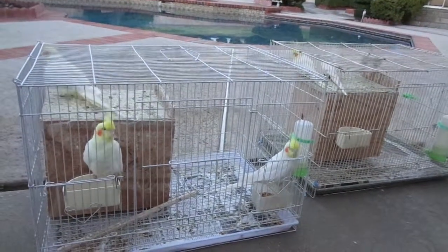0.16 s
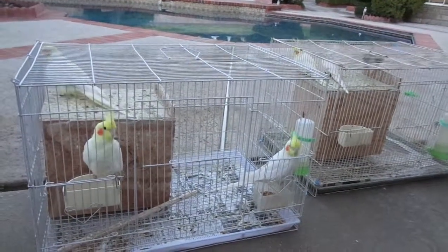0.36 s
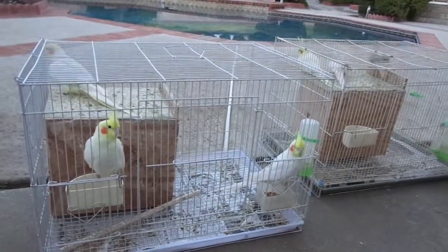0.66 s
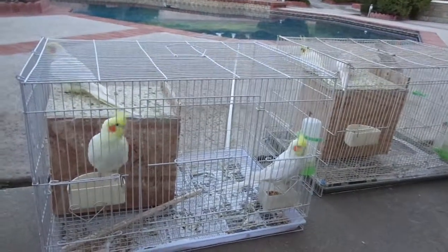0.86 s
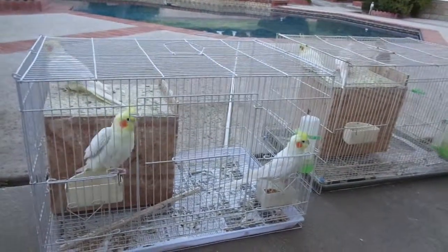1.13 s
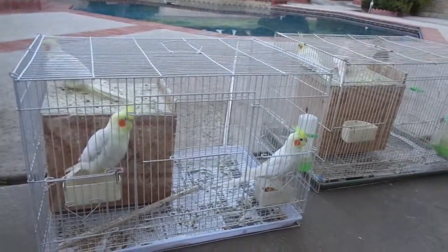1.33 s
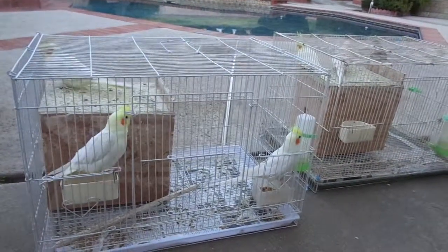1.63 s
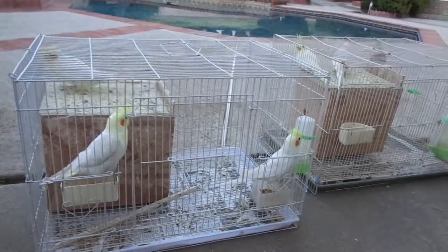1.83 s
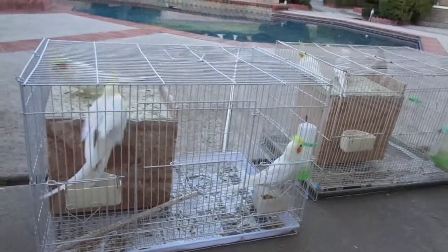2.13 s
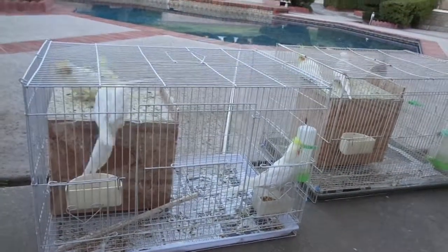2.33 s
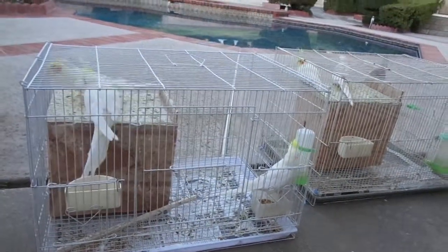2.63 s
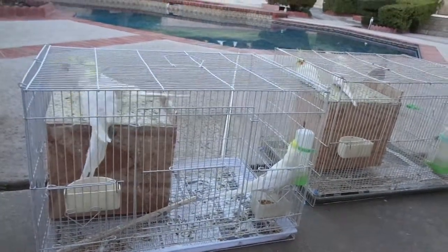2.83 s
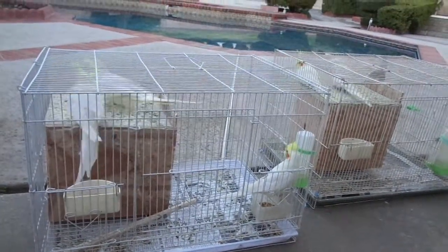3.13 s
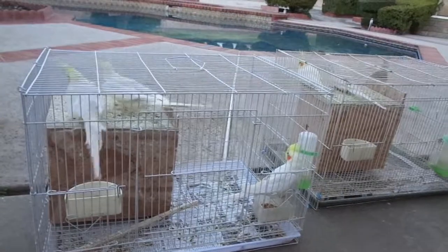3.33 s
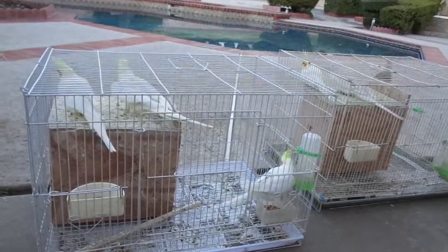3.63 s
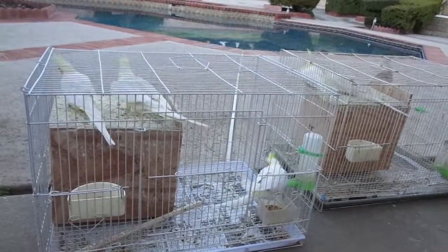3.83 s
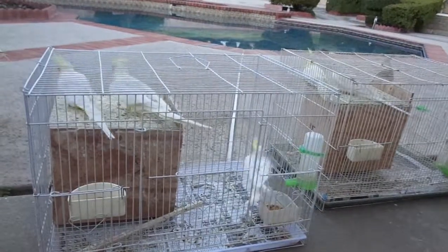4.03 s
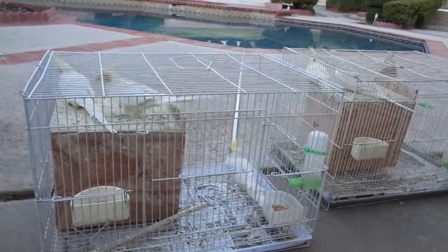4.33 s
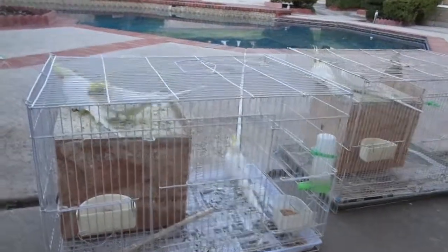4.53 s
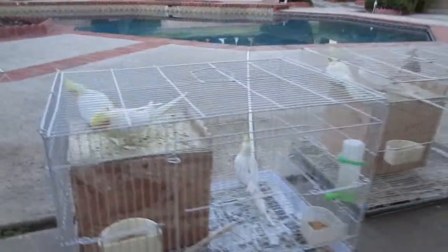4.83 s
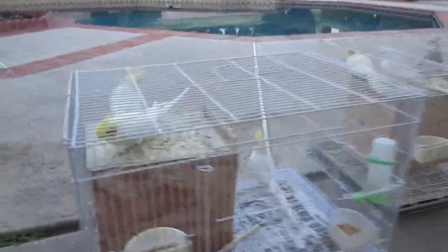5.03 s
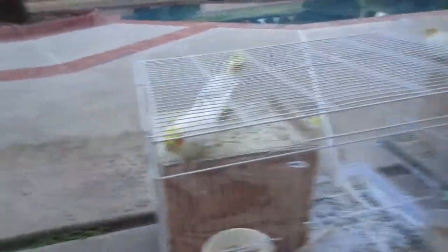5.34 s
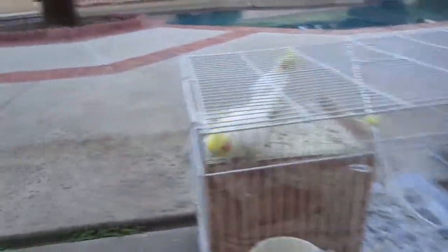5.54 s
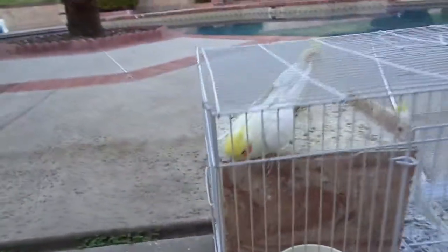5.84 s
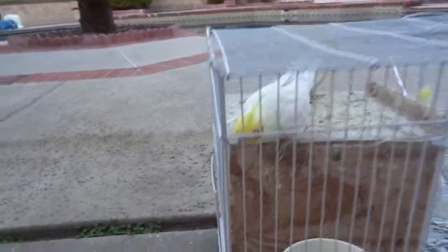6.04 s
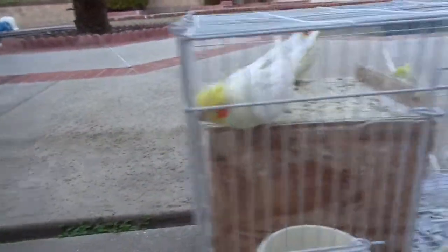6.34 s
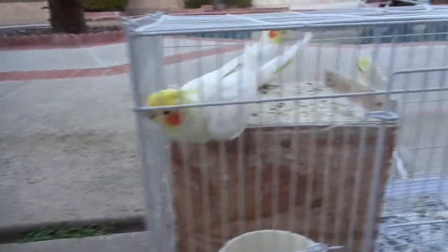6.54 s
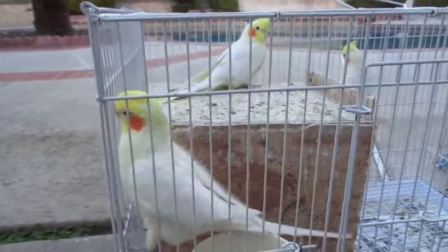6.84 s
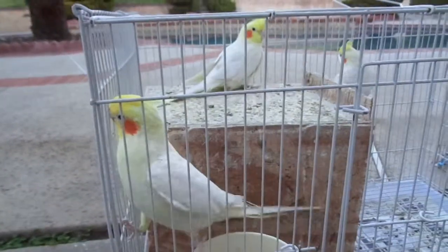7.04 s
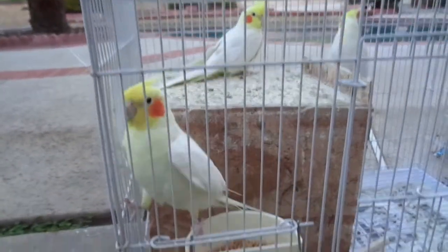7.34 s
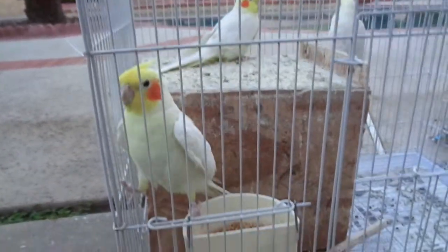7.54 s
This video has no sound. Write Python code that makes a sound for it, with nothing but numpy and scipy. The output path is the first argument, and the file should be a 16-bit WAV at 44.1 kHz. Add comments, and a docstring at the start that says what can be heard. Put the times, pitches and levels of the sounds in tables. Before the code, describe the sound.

A cockatiel close by sings six short, high whistles in an even run. After a pause it starts a second run, mixing whistles with rough, rasping warbles. The song stops, leaving soft shuffles on a hollow wooden nest box, claws ticking on wire bars and one low, hoarse chirp. Quiet outdoor air and a few faint distant bird chirps lie behind, with a slight patio echo.

```python
"""A cockatiel sings in a wire cage on a patio: two runs of arched whistles, rasping warbles and a low chirp.
A vibrating membrane in its syrinx gives a nearly pure tone, which turns rough when the motion is chaotic.
Claws tick on the bars, birds shuffle on a resonant wooden nest box, and there are soft thuds.
Floor, box and house wall reflect the sound, over distant chirps, quiet outdoor air,
the hum of a pool pump and faint gusts."""
import sys
import numpy as np
from scipy import signal
from scipy.fft import rfft, irfft
from scipy.io import wavfile

SR = 44100
rng = np.random.default_rng(int(sys.argv[2]) if len(sys.argv) > 2 else 0)


def unload_wav(signal):
    """Save mono or channel-first audio to the path in sys.argv[1] as 16-bit WAV at rate SR, clipped to [-1, 1]."""
    wavfile.write(
        sys.argv[1],
        SR,
        np.round(np.clip(np.atleast_2d(signal).T, -1, 1) * 32767).astype(np.int16),
    )


N = 338688
TIME = np.arange(N) / SR

# whistled notes: t/s, length/s, f/Hz, glide/semitones, scoop/semitones, flick/semitones,
# loudest point/share of length, level/dB, overtones/dB, beak lift at 12 kHz/dB, flutter depth/1
WHISTLES = [ (0.027, 0.12, 2265, 1.08, -0.2, -1.94, 0.56, -13.5, -47, -8, 0),
            (0.23, 0.084, 2155, -0.3, -0.5, -4, 0.6, -16.5, -55, 4.5, 0),
            (0.435, 0.11, 2333, -0.53, -0.7, -0.7, .68, -15, -46, -3.5, 0.1),
            (0.662, 0.076, 2141, -0.74, 1, -2.4, 0.53, -18, -52, 0.5, 0.02),
            (0.878, 0.088, 2215, -0.34, -0.2, -.2, 0.6, -12.5, -49, -4.5, 0.06),
            (1.094, .067, 1972, -0.3, 1.7, 3, 0.61, -19.5, -51, -9.5, 0.07),
            (2.628, 0.058, 1804, -2.3, 0.9, -1, .55, -28, -82, -5, 0.26),
            (2.69, .086, 1797, 0, -2.5, -4, 0.51, -15, -58, -6.5, .01),
            (2.942, .068, 2188, 3, -2.5, -2.0, 0.5, -18, -52, -10.5, 0.14),
            (3.309, 0.071, 2211, 0.2, -1, -3, 0.64, -21, -46.5, -14, 0.04),
            (3.513, 0.12, 2340, 2.13, 0.5, -0.6, .55, -15, -45, -9, 0.2),
            (3.726, 0.093, 1974, -0.2, 4, 0.8, 0.76, -20, -46, -19, 0.09),
            (3.968, 0.094, 2388, 1.14, -0.5, 0.5, .52, -13.5, -42, -18, 0.27),
            (4.19, .076, 1920, -0.5, 1.1, 3.5, 0.48, -16, -55.5, -8, 0.05),
            (6.433, 0.037, 1272, -2.1, 1.5, 0.3, 0.41, -22, -55, -8, 0.06), ]
# rasped notes: t/s, length/s, start f/Hz, top f/Hz, end f/Hz, top/share of length, clean/share of length,
# level/dB, swell/dB, overtones/dB, hoarse air/dB, warble rate/Hz, warble/share of f, chaos/share of f
RASPS = [ (3.093, 0.22, 1620, 2464, 1992, .5, 0.22, -27.5, 5.5, -42, -51.5, 119.2, 0.06, 0.053),
         (4.362, 0.21, 1657, 2490, 2234, .54, 0.236, -33.5, 5, -38.5, -57, 46.4, 0.186, 0.037),
         (4.624, 0.16, 1630, 2806, 2070, .78, 0.3, -30, -0.5, -39, -79, 100.8, 0.1, 0.066),
         (4.756, 0.097, 2037, 2507, 2350, .68, .05, -31.5, -5, -45.5, -71, 90.1, 0.15, 0.046),
         (6.496, .122, 1826, 2105, 1470, 0.73, 0.039, -33, -0.5, -59, -39, 41.8, 0.043, .008), ]
# throat and beak response for the overtones of whistles and of rasps: f/Hz, gain/dB
WHISTLE_TRACT = [(2600, -0.5), (3600, 15.5), (4000, -0.5), (4350, -5), (4800, -7.5), (6800, -5),
                 (9000, -19), (11700, 2.5), (13800, 2), (15200, -12)]
RASP_TRACT = [(3400, 6.5), (4200, -4.5), (5500, -5.5), (6400, -16.5), (9000, -25), (14000, -24)]
# spectrum of the hoarse breath: f/Hz, relative level/dB
BREATH_SPECTRUM = [(400, -37), (750, -15.5), (1000, -19), (1350, -5), (1650, -9), (2200, -19.5),
                   (2800, -31), (8000, -42.5), (15000, -35)]
# impacts of claws and beaks on bars and box: t/s, wire level/dB, cage level/dB
TICKS = [(0.614, -53, -65), (0.668, -48, -48.5), (1.456, -52.5, -70), (1.475, -60, -47),
         (2.103, -48.5, -38), (3.452, -51, -40), (3.474, -50, -59), (4.112, -47, -41), (5.499, -48.5, -67),
         (6.252, -53, -47), (6.427, -58, -40), (6.671, -44, -42), (6.768, -42.5, -45.5),
         (6.898, -58, -43.5), (7.226, -41.5, -45), (7.258, -60, -38.5), (7.461, -62, -42.5),
         (7.484, -62, -47)]
# spectra of the struck wire and of the cage body: f/Hz, relative level/dB
WIRE_SPECTRUM = [(1500, -19), (2600, 9), (4200, 5.5), (7000, 2), (12500, 2.5), (15000, -10)]
CAGE_SPECTRUM = [(300, -14), (800, 4.5), (1350, 11), (2100, 2), (3500, -27.5)]
# scrapes on the nest box: t/s, box level/dB, rise/s, decay time constant/s, rustle level/dB
SHUFFLES = [(0.771, -50.5, 0.032, 0.097, -56.5), (2.098, -54, 0.045, 0.15, -62),
            (4.121, -49, 0.018, 0.18, -57), (4.92, -44, 0.0033, 0.12, -51.5),
            (5.571, -46.5, 0.025, 0.064, -58), (7.255, -38, 0.0027, 0.047, -56)]
# spectra of the hollow box and of feathers: f/Hz, relative level/dB
BOX_SPECTRUM = [(200, -22), (450, -6), (720, -4), (860, 4.5), (990, -5), (1190, 7), (1500, -3.5),
                (2300, -8.5), (4000, -27)]
FEATHER_SPECTRUM = [(1500, -48.5), (3300, 9), (5500, -3.5), (7500, -1.5), (10000, -11.5), (14000, -9.5)]
# soft thuds, and at 4.43 s a low lump of the gust: t/s, level/dB, f/Hz, length/s
BUMPS = [(0.773, -56, 191, 0.14), (4.431, -60, 79, 0.072), (5.102, -52, 238, 0.054),
         (3.453, -53, 202, 0.041), (3.618, -63, 210, 0.17), (4.13, -53, 230, 0.07),
         (6.241, -50.5, 520, 0.027), (7.267, -57, 197, 0.13)]
# early reflections from floor, box and walls: delay/s, gain/1
ECHOES = [(.0032, -0.27), (.0085, -0.74), (.013, 0.016), (.019, 0.22), (.026, 0.32)]
# reverberation time of the patio: f/Hz, T60/s
PATIO_T60 = [(200, 0.62), (1200, 0.16), (2200, 0.36), (4500, 0.33), (12000, 0.1)]
# reflected share, which drops as the listener nears the cage: t/s, gain/dB
REFLECTED_GAIN = [(4.9, 0), (6.2, -4)]
# chirps of small distant birds: t/s, level/dB, f/Hz, length/s
FAR_CHIRPS = [(1.69, -62.5, 3900, 0.04), (1.835, -62, 4050, 0.035), (2.015, -56.5, 3870, 0.045),
              (5.012, -55, 4100, 0.063), (7.062, -55.5, 3940, 0.1)]
# spectra of still air and of a far-off wash: f/Hz, relative level/dB
AIR_SPECTRUM = [(15, -75.5), (25, -30.5), (65, -12.5), (135, -9), (167, -5), (271, -7.5), (309, -5),
                (488, -8.5), (769, -10.5), (1060, -9.5), (1420, -14), (2020, -16), (2300, -16.5),
                (15000, -26.5)]
WASH_SPECTRUM = [(150, -10), (450, 7.5), (1200, 7.5), (2200, -0.5), (4200, -12.5), (8000, -44)]
# slow course of the wash: t/s, level/dB
WASH_LEVEL = [(0, -61), (2.5, -62), (4.5, -60), (5.4, -57.5), (6.3, -58), (7.4, -54.5), (7.68, -60)]
# harmonics of the pump: t/s, fundamental level/dB, octave level/dB
PUMP_LEVELS = [(0, -70, -86), (1.6, -71, -66.5), (3.2, -70, -72.5), (3.8, -74.5, -69), (7.68, -69.5, -70)]
# gusts on the microphone: t/s, level/dB, half length/s
GUSTS = [(0.261, -67.5, 0.23), (2.85, -69.5, 0.57), (4.465, -65, .04)]
# spectrum of their rumble: f/Hz, relative level/dB
GUST_SPECTRUM = [(12, 1), (35, 0.5), (70, -3), (130, -21.5), (500, -64.5)]

BAND_LIMIT_HZ = 15150
LEAD_S, LEAD_DB, LEAD_SEMITONES = .022, -17.5, -3.5  # a faint, lower tone leads into each whistle
SCOOP_S, FLICK_S = .012, .01015  # time constants of settling on a note and of leaving it
ATTACK_S, RELEASE_S = .016, .0063  # the membrane starts and stops
SWELL_DB_PER_S, FADE_DB_PER_S = 166, 220  # before and after a whistle's loudest point
OVERTONE_ARCH_DB, OVERTONE_PEAK = 33.5, .43  # curvature of the overtone level; peak/share of length
FLUTTER_HZ, FLUTTER_LEAD_S, FLUTTER_HALF_S = 560, .015, .008  # the membrane flutters just before it shuts


def syrinx(hz, level_db, overtones_db, tract):
    """Source and filter: a membrane gives a tone whose weak harmonics are shaped by throat and beak."""
    phase = 2 * np.pi * np.cumsum(hz) / SR
    k = np.arange(2, 11)[:, None]
    gains = amp(spectrum_at(tract, k * hz)) * (k * hz < BAND_LIMIT_HZ)
    overtones = (gains * np.sin(k * phase)).sum(0)
    return amp(level_db) * np.sin(phase) + amp(overtones_db) * overtones


def whistle(length, note_hz, glide, scoop, flick, peak, level_db, overtones_db, lift_db, flutter,
            jitter=.0088, waver_db=1.87, upper_side=.27):
    """Periodic membrane vibration gives a clean, gliding note; closing flutter adds sidebands."""
    t = np.arange(-LEAD_S, length, 1 / SR)
    sung, lead = np.maximum(t, 0), np.maximum(-t / LEAD_S, 0)
    semitones = LEAD_SEMITONES * lead + scoop * np.exp(-sung / SCOOP_S)
    semitones += glide * (sung / length - .5) + flick * np.exp((t - length) / FLICK_S)
    hz = note_hz * 2 ** (semitones / 12) * (1 + jitter * wander(100, len(t)))
    past_peak = sung - peak * length
    tone_db = level_db + np.minimum(SWELL_DB_PER_S * past_peak, -FADE_DB_PER_S * past_peak)
    tone_db += waver_db * wander(55, len(t))
    upper_db = overtones_db - OVERTONE_ARCH_DB * (t / length - OVERTONE_PEAK) ** 2
    upper_db += 2 * wander(70, len(t))
    tract = [(f, db + lift_db * np.clip((f - 4000) / 8000, 0, 1)) for f, db in WHISTLE_TRACT]
    lead_in = amp(LEAD_DB) * gate(t + LEAD_S, ATTACK_S, RELEASE_S)
    opening = np.maximum(gate(t, ATTACK_S, RELEASE_S), lead_in)
    tone = opening * syrinx(hz, tone_db, upper_db, tract)
    depth = flutter * np.exp(-((length - FLUTTER_LEAD_S - t) / FLUTTER_HALF_S) ** 2)
    flutter_hz = FLUTTER_HZ * (1 + .35 * wander(190, len(t)))
    beat = np.exp(2j * np.pi * np.cumsum(flutter_hz) / SR)
    # pitch and amplitude shake together, so the lower sideband is the stronger
    sidebands = (1 - upper_side) / beat + upper_side * beat
    return (signal.hilbert(tone) * (1 + depth * sidebands)).real


def rasp(length, start_hz, top_hz, end_hz, top, clean, level_db, swell_db, overtones_db, hoarse_db,
         warble_hz, warble, chaos, climb_width=.56, break_s=.017,
         fade_db=9.5, overtone_swell_db=3.5, overtone_fade_db=18.5):
    """Fast warble and chaotic modulation roughen a note as it climbs and sags; breath adds noise."""
    t = np.arange(0, length, 1 / SR)
    progress = t / length
    climb = np.exp(-(np.minimum(progress / top - 1, 0) / climb_width) ** 2)
    sag = (np.maximum(progress - top, 0) / (1 - top)) ** 2
    rough = np.maximum(.5 + .5 * np.tanh((t - clean * length) / break_s), .24)
    cycles = np.cumsum(warble_hz * (1 + .079 * wander(52.2, len(t)))) / SR
    swing = 2 * (abs(np.sin(np.pi * cycles)) - 2 / np.pi)  # round arches with sharp dips between
    hz = start_hz + (top_hz - start_hz) * climb + (end_hz - top_hz) * sag
    hz *= 1 + rough * (warble * swing + chaos * wander(400, len(t)))
    shimmer = 6 * chaos * wander(390, len(t))
    strength = unit(1 + rough * (shimmer + .12 * swing))  # loudest at the top of each swing
    tone_db = level_db - swell_db * (1 - climb) - fade_db * sag
    upper_db = overtones_db - overtone_swell_db * (1 - climb) - overtone_fade_db * sag
    tone = strength * syrinx(hz, tone_db, upper_db, RASP_TRACT)
    breath = rough * amp(hoarse_db) * noise(BREATH_SPECTRUM, len(t))
    breath *= unit(1 + .5 * wander(130, len(t)))
    return gate(t, attack_s=.013, release_s=.0073) * (tone + breath)


def cockatiel():
    """The song is a superposition of whistles and rasps, each at its own onset."""
    out = np.zeros(N)
    for s, *note in WHISTLES:
        add(out, s - LEAD_S, whistle(*note))
    for s, *note in RASPS:
        add(out, s, rasp(*note))
    return out


def claw_ticks(rise_s=.002, wire_decay_s=.007, cage_decay_s=.006):
    """Impact excites the bright wire and the duller cage; damping makes both decay exponentially."""
    out, t = np.zeros(N), np.arange(4096) / SR
    for s, wire_db, cage_db in TICKS:
        snap = amp(wire_db) * noise(WIRE_SPECTRUM, len(t)) * np.exp(-t / wire_decay_s)
        knock = amp(cage_db) * noise(CAGE_SPECTRUM, len(t)) * np.exp(-t / cage_decay_s)
        add(out, s, np.minimum(t / rise_s, 1) * (snap + knock))
    return out


def box_shuffles(grain_db=3):
    """Uneven friction drives the resonances of the hollow box while feathers rustle."""
    out, t = np.zeros(N), np.arange(16384) / SR
    for s, box_db, rise, decay, rustle_db in SHUFFLES:
        stroke = np.minimum(t / rise, 1) * np.exp(-np.maximum(t - rise, 0) / decay)
        grains = unit(amp(grain_db * wander(180, len(t))))
        wood = amp(box_db) * noise(BOX_SPECTRUM, len(t))
        feathers = amp(rustle_db) * noise(FEATHER_SPECTRUM, len(t))
        add(out, s, stroke * grains * (wood + feathers))
    return out


def bumps():
    """A short burst of low band noise with tapered ends is heard as a dull thud."""
    out = np.zeros(N)
    for s, level_db, hz, length in BUMPS:
        size = int(length * SR)
        thud = noise([(hz / 4, -20), (hz, 0), (hz * 2, -9), (hz * 8, -45), (hz * 20, -70)], size)
        add(out, s, amp(level_db) * thud * signal.windows.tukey(size, .5))
    return out


def patio(direct, tail_db=-9, build_s=.031):
    """Reflection adds a few near echoes, then a diffuse reverberant tail whose treble dies first."""
    hz, t, spectra = signal.stft(rng.standard_normal(SR), SR, nperseg=256)
    decay = amp(-60 * t / spectrum_at(PATIO_T60, hz)[:, None])
    tail = signal.istft(spectra * decay, SR, nperseg=256)[1]
    tail *= 1 - np.exp(-(np.arange(len(tail)) / SR / build_s) ** 2)
    f = np.fft.rfftfreq(len(tail), 1 / SR)
    song_band = (f > 1500) & (f < 3000)
    response = amp(tail_db) * tail / np.sqrt(np.mean(abs(rfft(tail)[song_band]) ** 2))
    # the overtones beam forward from the beak, so the echoes carry little treble
    lowpass = np.hanning(11) / np.hanning(11).sum()
    for delay, gain in ECHOES:
        add(response, delay, gain * lowpass)
    reflected = signal.fftconvolve(direct * amp(curves(REFLECTED_GAIN)[0]), response)[:N]
    return direct + reflected


def far_birds(arch=.11, buzz=.052):
    """Fast random frequency modulation puts a buzz on each small arched chirp."""
    out = np.zeros(N)
    for s, level_db, hz, length in FAR_CHIRPS:
        swell = np.sin(np.linspace(0, np.pi, int(length * SR)))
        pitch = hz * (1 + arch * (swell - .7) + buzz * wander(290, len(swell)))
        add(out, s, amp(level_db) * swell * np.sin(2 * np.pi * np.cumsum(pitch) / SR))
    return out


def outdoor_air(air_db=-54.5, waver_db=.51):
    """Two broadband noises add in power: steady air and a slowly swelling far-off wash."""
    air = amp(air_db) * noise(AIR_SPECTRUM, N)
    wash = noise(WASH_SPECTRUM, N) * amp(curves(WASH_LEVEL)[0] + waver_db * wander(6.1, N))
    return air + wash


def pool_pump(hum_hz=81.8, drift=.022):
    """Nearly periodic vibration gives a wavering fundamental and its octave."""
    phase = 2 * np.pi * np.cumsum(hum_hz * (1 + drift * wander(9.4, N))) / SR
    fundamental_db, octave_db = curves(PUMP_LEVELS)
    return np.sqrt(2) * (amp(fundamental_db) * np.sin(phase) + amp(octave_db) * np.sin(2 * phase))


def gusts(waver_db=2):
    """Pressure fluctuations in moving air make a faint, lumpy rumble."""
    envelope = sum(amp(db) * np.exp(-((TIME - s) / half) ** 2) for s, db, half in GUSTS)
    return noise(GUST_SPECTRUM, N) * envelope * amp(waver_db * wander(8, N))


def amp(db):
    """Amplitude ratio of a level in decibels."""
    return 10 ** (np.asarray(db) / 20)


def unit(x):
    """Normalisation to rms 1."""
    return x / np.sqrt(np.mean(x ** 2) + 1e-20)


def spectrum_at(points, hz):
    """Interpolation on a logarithmic frequency axis."""
    f, value = np.transpose(points)
    return np.interp(np.log(hz + 1), np.log(f + 1), value)


def curves(rows):
    """Linear interpolation of each column of a time table over the scene."""
    times, *columns = np.transpose(rows)
    return [np.interp(TIME, times, column) for column in columns]


def add(mix, s, sound):
    """Superposition of a sound on the mix, starting at s seconds."""
    part = mix[max(round(s * SR), 0):][:len(sound)]
    part += sound[:len(part)]


def noise(spectrum, size):
    """White noise filtered to the given spectrum, at rms 1."""
    gain = amp(spectrum_at(spectrum, np.fft.rfftfreq(size, 1 / SR)))
    return unit(irfft(rfft(rng.standard_normal(size)) * gain, size))


def wander(rate_hz, size):
    """Random fluctuation of rms 1, low-passed at the given rate."""
    f = np.fft.rfftfreq(size, 1 / SR)
    return unit(irfft(rfft(rng.standard_normal(size)) * (f > 0) / (1 + (f / rate_hz) ** 4), size))


def gate(t, attack_s, release_s):
    """Envelope with sine-squared attack and release."""
    ramp = np.clip(np.minimum(t / attack_s, (t[-1] - t) / release_s), 0, 1)
    return np.sin(np.pi / 2 * ramp) ** 2


def scene():
    """Sound pressures add: cage and far birds with their reflections, then the background."""
    cage = cockatiel() + claw_ticks() + box_shuffles() + bumps()
    return (patio(cage + far_birds()) + outdoor_air() + pool_pump() + gusts())[None]


def record(dry):
    """A linear-phase low-pass filter limits the bandwidth."""
    lowpass = signal.firwin(511, BAND_LIMIT_HZ, window=("kaiser", 9), fs=SR)
    return signal.oaconvolve(dry, lowpass[None], "same")


dry = scene()
out = record(dry)
unload_wav(out)
```